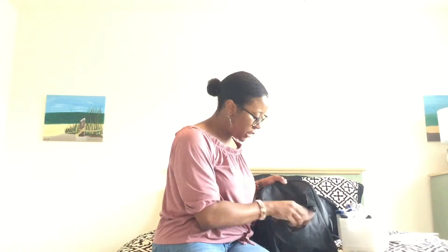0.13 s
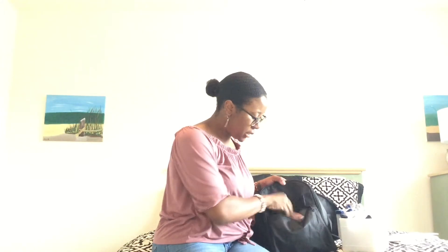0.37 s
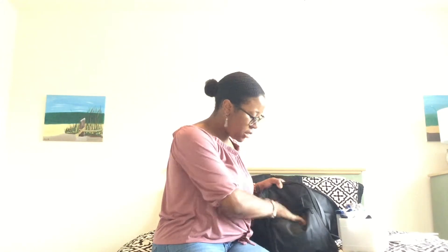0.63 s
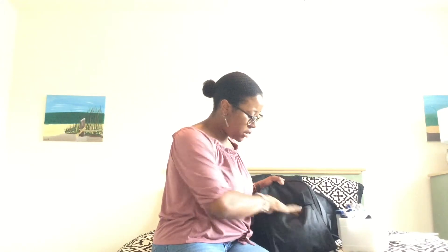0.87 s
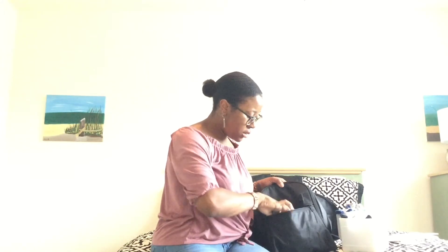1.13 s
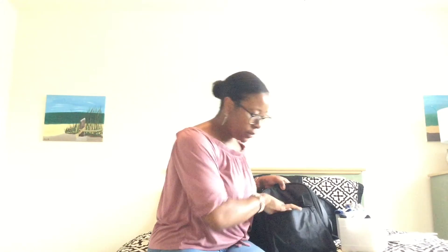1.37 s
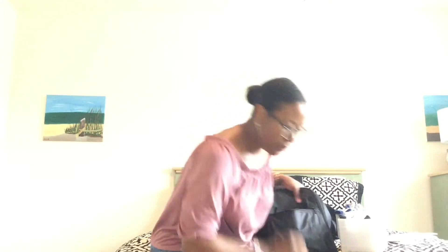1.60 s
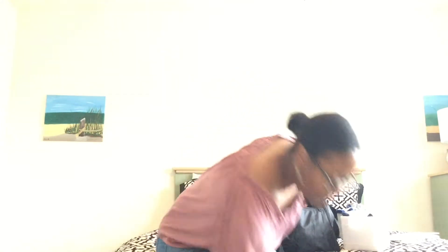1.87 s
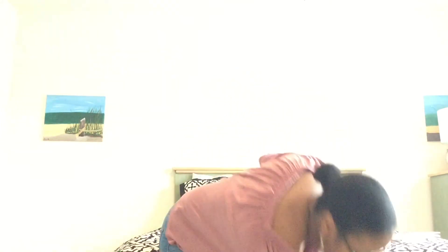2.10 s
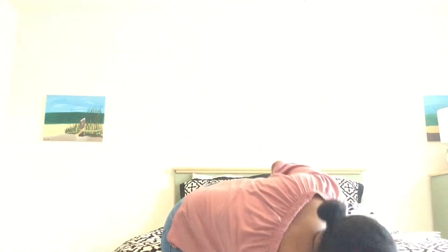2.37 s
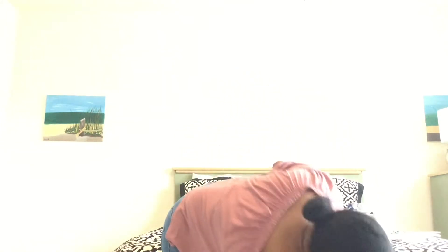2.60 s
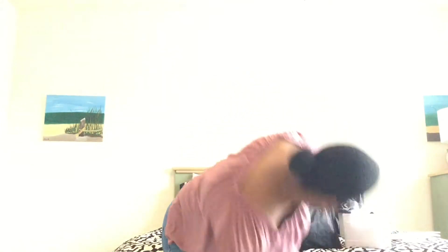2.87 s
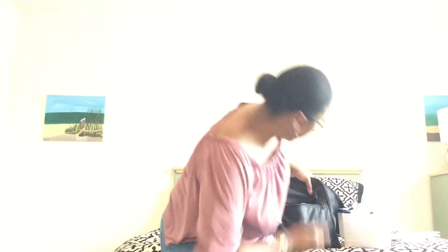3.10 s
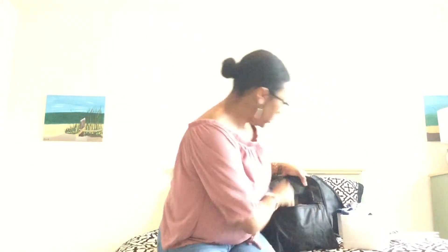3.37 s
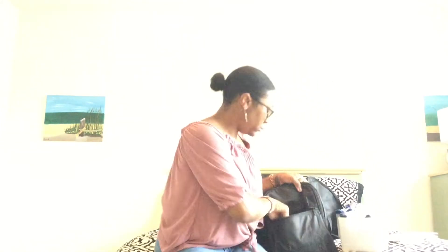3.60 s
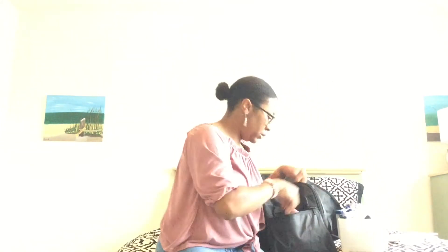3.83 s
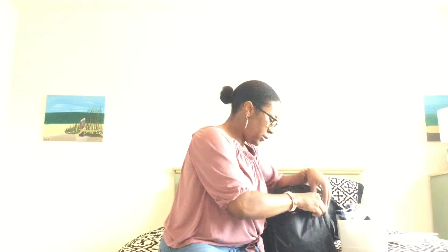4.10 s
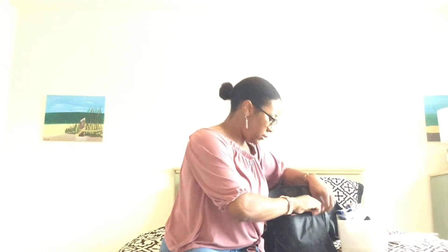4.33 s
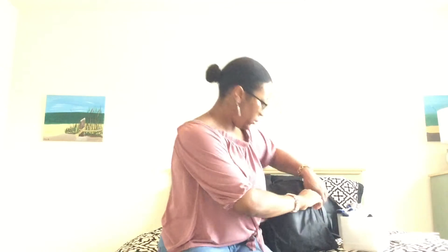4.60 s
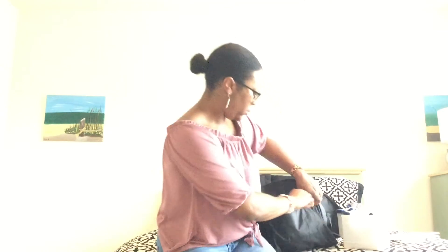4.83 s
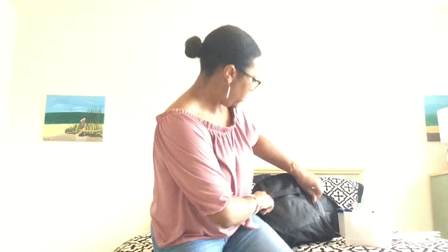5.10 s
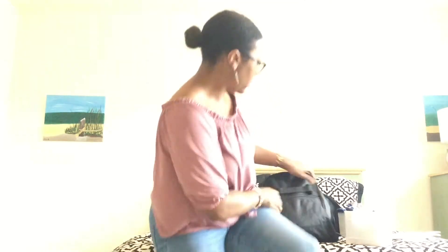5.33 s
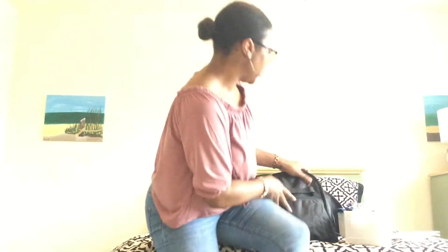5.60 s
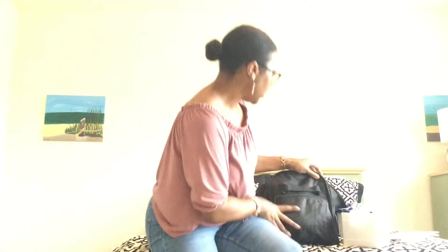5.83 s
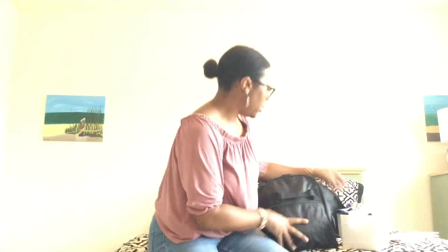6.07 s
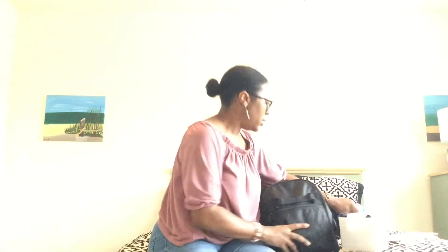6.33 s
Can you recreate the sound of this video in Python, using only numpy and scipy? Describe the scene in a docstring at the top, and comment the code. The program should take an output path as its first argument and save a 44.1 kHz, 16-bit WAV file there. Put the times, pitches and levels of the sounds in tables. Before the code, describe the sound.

In a small quiet room, a hand slides brightly over a bag's woven fabric, with soft knocks and muffled low bumps. After another rustling grip the handling nearly stops, leaving faint shuffles. Rustles and fine metal pull ticks return, building to a loud crumple and drumming thumps near five seconds, a brief rasp, lighter rubs, then a strong knock. Close small microphone, faint wavering hum.

```python
"""A fabric duffel bag is handled on a bed in a small quiet room, over room noise and a wavering hum.
At first skin slides over the weave (patchy, gritty noise) while the first knocks fall (short rings, snaps).
Then the stuffed bag booms and its creases rustle (noise through resonances); a metal pull ticks (beating sines).
Near 5 s the pocket mouth rasps shut (two rough gliding partials); ticks and a last strong knock follow."""
import sys
import numpy as np
from scipy import signal
from scipy.fft import rfft, irfft, next_fast_len
from scipy.io import wavfile
from scipy.ndimage import uniform_filter1d, map_coordinates

SR = 44100
rng = np.random.default_rng(int(sys.argv[2]) if len(sys.argv) > 2 else 0)


def how_loud(loudness_db):
    """Turn decibels into a plain amplitude multiplier (0 dB gives 1, 20 dB gives 10)."""
    steps = np.asarray(loudness_db, float) / 20
    return 10 ** steps


def file_out(sig):
    """Save sig as 16-bit WAV at sys.argv[1]."""
    # one column per channel
    cols = np.atleast_2d(sig).T
    # limit, then scale
    lim = np.clip(cols, -1, 1)
    pcm = np.round(lim * 32767).astype(np.int16)
    wavfile.write(sys.argv[1], SR, pcm)


N = 284577
T = np.arange(N) / SR


def unit(x):
    """Scale to rms 1."""
    return x / np.sqrt(np.mean(x ** 2) + 1e-20)


def along(points, hz):
    """Interpolate (Hz, value) points on a log frequency axis."""
    f, v = np.transpose(points)
    return np.interp(np.log(hz + 1), np.log(f + 1), v)


def curves(rows):
    """One value per sample for each column after the time."""
    s, *cols = np.transpose(rows)
    return [np.interp(T, s, c) for c in cols]


def wobble(rate_hz):
    """A smooth random curve, rate_hz knots a second."""
    return map_coordinates(rng.standard_normal(int(N * rate_hz / SR) + 4), [T * rate_hz])


def narrow(width_hz):
    """Complex noise of rms 1 that makes a tone rough over this width."""
    return (unit(wobble(width_hz)) + 1j * unit(wobble(width_hz))) / np.sqrt(2)


def filtered(x, response):
    """x times a complex response of frequency."""
    m = next_fast_len(N + SR // 2)
    return irfft(rfft(x, m) * response(np.fft.rfftfreq(m, 1 / SR)), m)[..., :N]


def cut_above(f, hz, power):
    """Gain that falls above hz."""
    return 1 / (1 + (f / hz) ** power)


def cut_below(f, hz, power):
    """Gain that falls below hz."""
    return 1 / (1 + (hz / (f + 1)) ** power)


def modes(table):
    """Causal response of (center_hz, width_hz, level_db) resonances, signs alternating."""
    def response(f):
        total = 0
        for k, (hz, width_hz, db) in enumerate(table):
            bell = 1j * f * width_hz / (hz * hz - f * f + 1j * f * width_hz)
            total = total + (-1) ** k * how_loud(db) * bell
        return total
    return response


def friction(slips_hz, spread_db, share, patchy_db):
    """Noise in narrow random patches plus a share of small slips of uneven size."""
    z = signal.stft(rng.standard_normal(N), nperseg=1024)[2]
    field = uniform_filter1d(rng.standard_normal(z.shape), size=3, axis=0)
    field = uniform_filter1d(field, size=5, axis=1)
    bed = signal.istft(z * how_loud(patchy_db * unit(field)), nperseg=1024)[1][:N]
    sizes = how_loud(spread_db * np.tanh(rng.standard_normal(N)))
    grit = (rng.random(N) < slips_hz / SR) * rng.choice([-1, 1], N) * sizes
    return unit(bed) + share * unit(grit)


def gestures(rows, rise_s, rest_db):
    """Level in dB of gestures that rise, hold and fade (seconds per 20 dB), power-summed with a rest level."""
    t = T[::64]
    start_s, hold_s, fade_s, db = (c[:, None] for c in rows)
    rise = np.maximum(start_s - t, 0) / rise_s
    fade = np.maximum(t - start_s - hold_s, 0) / np.maximum(fade_s, .01)
    power = np.interp(T, t, np.sum(how_loud(2 * (db - 20 * (rise + fade))), axis=0))
    return 10 * np.log10(power + how_loud(2 * rest_db))


# stuffed bag: center_hz, width_hz, level_db
BAG_MODES = [(158, 44, -9.5), (191.3, 21.4, 1.5), (232.6, 59, -11.5)]


def boom():
    """Sparse slips excite the low modes of the stuffed bag."""
    noise = friction(60, 8.0, share=0.51, patchy_db=1)
    return unit(filtered(noise, lambda f: modes(BAG_MODES)(f) * cut_above(f, 300, 4)))


# side walls of the bag: center_hz, width_hz, level_db
SIDE_MODES = [(246.8, 35.6, 0), (303.4, 26.6, -2), (328.4, 23.6, -0.5), (404, 114, -13)]


def flex():
    """Slips excite the side walls as they flex."""
    noise = friction(90, 6.0, share=0.7, patchy_db=1.0)
    return unit(filtered(noise, lambda f: modes(SIDE_MODES)(f) * cut_above(f, 520, 4) * cut_below(f, 200, 4)))


# stiff panels: center_hz, width_hz, level_db
CREASE_MODES = [(522, 72, 1), (626.4, 32, 3.5), (683, 71, -0.5), (990, 162, -1), (1180, 155, 0.5),
                (1515, 295, -5), (2080, 470, -5.5), (2890, 1800, -18)]


def rustle():
    """Creases excite the stiff panels with slips and patchy noise."""
    noise = friction(300, 3.7, share=0.52, patchy_db=3.0)
    return unit(filtered(noise, lambda f: modes(CREASE_MODES)(f) * cut_below(f, 420, 4)))


# rub spectrum: frequency_hz, density_db_per_hz
RUB_SPECTRUM = [(2200, -4), (3200, 1), (4300, -1), (5500, -3), (7000, -8.5), (9000, -12.5)]


def rub():
    """Dense slips of the rubbed cloth, shaped by a smooth treble spectrum."""
    noise = friction(650, 3.4, share=0.4, patchy_db=3.5)
    return unit(filtered(noise, lambda f: how_loud(along(RUB_SPECTRUM, f))))


# ribs of the weave: center_hz, width_hz, level_db
WEAVE_MODES = [(5330, 530, -12), (7240, 1000, -10.5), (8110, 126, 1.5), (9700, 990, -3), (10960, 226, 4),
               (11900, 630, 0.5), (13400, 510, -5), (14000, 1900, -7)]


def slide():
    """Skin on the weave: dense slips, resonant across the ribs, a plain hiss elsewhere."""
    hiss = friction(830, 6.2, share=0.32, patchy_db=4.5)
    flat = unit(filtered(hiss, lambda f: (1 + .5 * np.exp(-((f - 9200) / 1500) ** 2)) * cut_below(f, 6200, 8)))
    ribbed = unit(filtered(hiss, lambda f: modes(WEAVE_MODES)(f) * cut_below(f, 5000, 8)))
    return np.where(T < .52, ribbed, flat)  # the first long slide crosses the ribs


# restless hands between gestures: time_s, rustle_db
REST = [(0, -93), (.3, -78), (.6, -69), (.79, -77), (1.1, -77), (1.38, -81), (1.81, -73), (2.08, -77),
        (2.3, -77.5), (2.84, -85), (3.43, -78), (3.7, -73), (4.0, -83.5), (4.5, -74), (4.8, -73),
        (5.3, -71.5), (5.93, -74.5), (6.45, -68)]
# pushes on the bag: start_s, hold_s, fade_s_per_20db, boom_db, flex_over_boom_db
PUSHES = [(0.223, 0.004, 0.1, -52.5, -3.5), (0.346, 0.17, -0.2, -54, -7), (0.429, 0.0061, 0, -43, -2.5),
          (0.533, 0.026, -0.12, -46, -3.5), (0.646, 0.014, 0.14, -54.5, 0), (0.75, 0.025, 0.4, -57.5, -4),
          (0.917, 0.14, 0.08, -51.5, -11.5), (1.205, 0.035, 0.9, -63, -6), (1.484, 0.037, 0.14, -48.5, -8),
          (1.567, 0.049, 0.01, -44.5, 1), (1.715, 0.0081, 0.2, -52.5, -8.5),
          (2.148, 0.038, 0.01, -57.5, 1.5), (2.287, 0.015, 0, -58, -7.5), (2.6, 0.048, 0.3, -65, -17),
          (2.933, 0.042, .2, -63.5, 1), (3.11, 0.016, 1.3, -63, -11.5), (3.473, 0.059, -0.06, -49.5, -11.5),
          (3.55, 0.26, 0.4, -58.5, -4.5), (4.017, 0.074, -0.9, -58, -8), (4.143, 0.023, 1.1, -57, -10),
          (4.316, 0.049, 0.35, -50, -9), (4.603, 0.019, 1.1, -54, -3), (4.688, .05, 0.24, -45, -16),
          (4.866, 0.12, 0.12, -47, 1.5), (5.037, 0.052, 0.16, -44.5, -3.5), (5.152, 0.014, 0.1, -46, 6),
          (5.26, 0.04, 0.05, -56, -27), (5.395, 0.016, 0, -61, -2), (5.548, 0.0035, 0.16, -49.5, -14),
          (5.732, 0.048, 0.17, -54, -6.5), (5.917, 0.018, 1, -60, -7), (6.023, 0.004, -0.14, -51.5, -8.5),
          (6.144, 0.0055, 0.13, -48, -13.5), (6.312, 0.052, -0.05, -44, -3.5), (6.445, .01, 3, -35, -8.5)]
# grips that crumple the cloth: start_s, hold_s, fade_s_per_20db, rustle_db, rub_over_rustle_db
CRUMPLES = [(0, .005, 0.12, -60, 0.5), (0.19, 0.0028, 0.3, -67, 2.5), (0.386, 0.036, 0.05, -66.5, -12),
            (0.444, 0.03, 0.24, -61, -4), (0.646, 0.051, 0.05, -59, -8), (0.841, 0.19, 0.2, -67.5, -3.5),
            (1.219, 0.02, 0.26, -71.5, 2), (1.452, .04, 0.21, -59.5, -7.5), (1.547, 0.083, 0.05, -59, -0.5),
            (1.68, 0.021, 0.12, -67.5, 5.5), (2.138, 0.0092, 0.3, -66.5, -19), (2.942, .04, 0.35, -73, -16),
            (3.15, 0.11, 0, -76.5, -0.5), (3.477, 0.022, 0.15, -62, 0.2), (3.57, 0.049, 0.35, -67, -6),
            (3.707, .03, 0.32, -71, -1), (3.816, 0.041, 0.37, -68, -6.5), (4.067, .005, -0.02, -64.5, -7.5),
            (4.141, 0.056, 0.26, -67.5, -6), (4.326, .005, 0.38, -64, -3.5), (4.447, 0.2, 0.5, -69, -14),
            (4.691, 0.0083, -0.02, -54.5, -4.5), (4.742, .005, -0.05, -55.5, -15),
            (4.865, 0.049, 0.16, -53.5, -22), (4.947, 0.063, 0.16, -50.5, -14),
            (5.049, 0.098, 0.13, -49.5, -14.5), (5.379, 0.068, -0.16, -63.5, -7),
            (5.556, .005, -0.26, -66, -23.5), (5.663, 0.054, 2, -72, 1), (5.753, 0.022, 0.3, -66, -12),
            (6.023, 0.039, 0.05, -66.5, 4.5), (6.222, 0.038, 0.2, -69, 1), (6.318, 0.066, 0, -57, -9),
            (6.429, .03, 0.5, -58, -2.5)]
# skin over the weave: start_s, hold_s, fade_s_per_20db, level_db
SKIN_SLIDES = [(0, 0.016, 0.26, -51.5), (0.02, 0.44, 0.07, -53.5), (.5, 0.033, 0.4, -68.5),
               (0.627, 0.094, -0.2, -65), (0.855, 0.03, 0.46, -65), (1.23, 0.021, 0.3, -71),
               (1.538, 0.027, 0.23, -61), (1.58, 0.038, 0.21, -59), (3.146, 0.11, 0.3, -72.5),
               (3.47, 0.024, 0.4, -65.5), (3.791, 0.056, 0.15, -71), (4.164, .01, 0.25, -68),
               (4.338, 0.07, 0, -65.5), (4.65, 0.028, -0.04, -67), (4.99, .01, 0.2, -64.5),
               (5.06, 0.078, 0.2, -70.5), (5.27, 0.13, 0.1, -74.5), (5.655, 0.33, .1, -67.5),
               (6.023, 0.066, .07, -61), (6.206, 0.12, 0.5, -71), (6.33, 0.1, .01, -64.5)]


def hands():
    """Levels in dB of push, flex, rustle, rub and slide from the gestures."""
    push_rise_s, grip_rise_s, slide_rise_s = 0.04, 0.056, 0.051  # per 20 dB
    rest_db, = curves(REST)
    push, grip = np.transpose(PUSHES), np.transpose(CRUMPLES)
    return (gestures(push[:4], push_rise_s, rest_db + 9),
            gestures([*push[:3], push[3] + push[4]], push_rise_s, rest_db + 3),
            gestures(grip[:4], grip_rise_s, rest_db),
            gestures([*grip[:3], grip[3] + grip[4]], grip_rise_s, rest_db - 5.5),
            gestures(np.transpose(SKIN_SLIDES), slide_rise_s, rest_db - 8))


def cloth():
    """Each way of moving the bag excites its own resonances, at levels that waver."""
    push_db, flex_db, rustle_db, rub_db, slide_db = hands()
    catch = wobble(14)  # the cloth catches and lets go
    grain = wobble(55)  # single creases give way
    out = how_loud(push_db + 1.43 * wobble(18)) * boom()
    out += how_loud(flex_db + 1.9 * catch) * flex()
    out += how_loud(rustle_db + 1.35 * catch + 1.43 * grain) * rustle()
    out += how_loud(rub_db + 1.2 * catch + 0.34 * grain) * rub()
    return out + how_loud(slide_db + 0.27 * catch) * slide()


# tones and brushes of the bag: low drumming, squeaks, scrapes and one bright hiss of sliding skin
# start_s, length_s, center_hz, width_hz, relative_db
BAG_STROKES = [(0, 0.039, 1444, 77, -53), (0.18, 0.077, 1680, 260, -58), (0.183, 0.052, 2500, 260, -61.5),
               (0.186, 0.056, 866, 165, -61.5), (0.181, 0.04, 3400, 350, -66.5),
               (.19, 0.036, 211, 41, -41.5), (0.399, 0.056, 1251, 460, -52.5),
               (0.439, 0.029, 200.5, 27, -34), (1.433, 0.086, 2230, 580, -61.5),
               (1.53, 0.24, 4600, 1650, -58.5), (1.532, 0.26, 2450, 400, -67), (1.538, 0.1, 1102, 380, -59),
               (2.918, 0.14, 997, 900, -67.5), (3.839, 0.029, 5100, 620, -72),
               (3.815, 0.064, 1510, 250, -72), (3.903, 0.046, 2090, 130, -72.5),
               (4.446, 0.029, 2376, 360, -61.5), (4.7, 0.11, 184.6, 17, -37.5),
               (4.85, 0.042, 184, 18.6, -30.5), (4.872, 0.027, 226, 28, -23), (4.9, 0.018, 250, 25, -33),
               (4.916, 0.015, 237, 25, -38), (4.928, 0.018, 260, 30, -33), (4.95, 0.02, 317, 45, -33),
               (4.968, 0.047, 199, 22, -29), (5.014, 0.039, 180, 23.4, -31), (5.011, 0.05, 90.5, 11, -37),
               (6.1, 0.055, 1470, 130, -64), (6.01, 0.074, 4010, 2200, -57), (5.65, .14, 12500, 5000, -65)]


def strokes():
    """Each stroke is a rough tone, or a band of noise if wide, that swells and fades."""
    out = np.zeros(N + SR)
    for start_s, length_s, center_hz, width_hz, db in BAG_STROKES:
        t = T[:round(length_s * SR)]
        skew, evenness = (1, .8) if center_hz < 400 else (.6, .15)  # low ones drum evenly, others flutter
        shape = np.sin(np.pi * (t / length_s) ** skew)
        rough = narrow(width_hz)[:len(t)]
        rough = rough / np.abs(rough) ** evenness
        band = np.real(rough * np.exp(2j * np.pi * center_hz * t))
        out[round(start_s * SR):][:len(t)] += how_loud(db + 0.5) * shape * band
    return out[:N]


# knocks and snaps of the cloth: start_s, relative_db, pitch_hz, relative_boom_db, relative_treble_db
CLOTH_KNOCKS = [(0.184, -49.5, 1600, 10, -13.5), (0.406, -50, 1250, 5, 3), (0.431, -42, 730, -7, -22),
                (1.215, -51.5, 720, -5, -19), (1.443, -55, 2020, -8, -23), (1.682, -44.5, 1130, 5, -29.5),
                (2.137, -45, 574, -4, -35.5), (2.65, -68.5, 1570, 8.5, 2), (3.467, -54, 1100, 3, -16),
                (3.475, -50, 4000, -6, -10), (4.052, -49.5, 515, -2, -28), (4.14, -57, 3430, -7, 2),
                (4.153, -52, 1280, 4, -10), (4.3098, -47.5, 1180, 7, 3), (4.443, -57, 2370, -6, -8),
                (4.683, -46.5, 596, 6, -26), (4.732, -44, 662, -1, -37), (4.948, -39, 1080, -2, -24),
                (4.954, -35, 750, 4, -22), (4.975, -31.5, 740, -8, -14.5), (5.072, -40, 680, 1, -14),
                (5.39, -48.5, 522, -17, 2), (5.639, -56.5, 4400, -13, -12), (6.001, -50.5, 1290, -4, -17),
                (6.303, -44.5, 1100, 6, -15), (6.433, -31.5, 1180, -8, -22)]


def knocks():
    """A short ring of the struck panel, a dull snap, a crack with a dying hiss, and a push into the bag."""
    out, blows, t = np.zeros(N + SR), np.zeros(N), T[:SR // 8]
    onset = 1 - np.exp(-t / 0.00023)
    for start_s, db, pitch_hz, boom_db, treble_db in CLOTH_KNOCKS:
        ring = how_loud(-60 * t / 0.0092) * np.sin(2 * np.pi * pitch_hz * t)
        noise = rng.standard_normal((2, len(t)))
        snap = 0.33 * uniform_filter1d(noise[0], size=7) * how_loud(-60 * t / 0.0075)
        crack = noise[1] * (how_loud(-60 * t / 0.0089) + 0.079 * how_loud(-60 * t / 0.086))
        hit = (ring + snap) * onset + how_loud(treble_db - 7.0) * crack
        out[round(start_s * SR):][:len(t)] += how_loud(db + 4) * hit
        blows[round(start_s * SR)] = how_loud(db + boom_db + 39.5)
    bag = modes(BAG_MODES + SIDE_MODES)
    return out[:N] + filtered(blows, lambda f: bag(f) / (1 + 1j * f / 500) / (1 - 1j * 110 / (f + 1)))


# closing pocket mouth: time_s, slip_rate_hz, first_partial_db, second_partial_db
POCKET_SLIPS = [(5.035, 459.4, -62, -52), (5.062, 500, -58, -47), (5.078, 631, -51, -43),
                (5.088, 741, -42.5, -49), (5.112, 597, -49.5, -54), (5.14, 366, -37, -46.5),
                (5.16, 241.4, -42, -52), (5.19, 423, -46.5, -58)]


def pocket():
    """The edges slip past each other at a gliding, shaky rate; two partials, each rough in its own way."""
    slip_hz, first_db, second_db = curves(POCKET_SLIPS)
    turns = np.cumsum(slip_hz * (1 + .04 * wobble(90))) / SR
    first = how_loud(first_db) * narrow(150) * np.exp(2j * np.pi * turns)
    second = how_loud(second_db) * narrow(210) * np.exp(2j * np.pi * 2 * turns)
    closing = (T > POCKET_SLIPS[0][0]) * (T < POCKET_SLIPS[-1][0])
    return closing * np.real(first + second)


# metal pull contacts: start_s, relative_db, pitch_hz, t60_s, relative_hardness_db
PULL_TICKS = [(1.0444, -65, 9200, 0.035, -9), (1.851, -64, 8210, 0.03, -14),
              (2.1011, -66.5, 8300, 0.027, -12), (2.1535, -62.5, 9300, 0.024, -11),
              (2.268, -67.5, 9100, 0.024, -6), (3.5048, -54, 9130, 0.073, -4),
              (3.525, -55, 9140, 0.058, -12), (3.539, -58, 9150, 0.047, -18),
              (3.5544, -61.5, 9400, 0.057, -15.5), (4.0128, -55.5, 9200, 0.021, -17),
              (4.1397, -43, 9000, 0.013, -16), (4.153, -55, 9800, 0.032, -13),
              (4.3093, -48.5, 9160, 0.028, 2.5), (5.383, -58, 9400, 0.023, -1),
              (6.012, -54, 8900, 0.051, -16)]
# short-lived other modes of the pull: mode_hz, level_db
PULL_MODES = [(2450, 5), (6650, -4), (11200, -3), (12300, -3), (15000, -1)]


def ticks():
    """Each tick of the metal pull rings as two close, beating high sines at its own pitch, plus other modes."""
    out, t = np.zeros(N + SR), T[:SR // 5]
    onset = 1 - np.exp(-t / 0.00029)
    for start_s, db, pitch_hz, t60_s, hard_db in PULL_TICKS:
        phase = rng.uniform(0, 2 * np.pi)
        pair = np.sin(2 * np.pi * pitch_hz * t) + 0.92 * np.sin(2 * np.pi * 1.02 * pitch_hz * t + phase)
        rest = sum(how_loud(level_db + 2 * rng.standard_normal()) * np.sin(2 * np.pi * mode_hz * t)
                   for mode_hz, level_db in PULL_MODES)
        ring = how_loud(-60 * t / max(t60_s, .005)) * onset * pair
        # a hard contact wakes the other modes
        out[round(start_s * SR):][:len(t)] += how_loud(db - 2.5) * (ring + how_loud(hard_db - 1.0 - 60 * t / 0.014) * rest)
    return out[:N]


# mattress: center_hz, width_hz, level_db
MATTRESS_MODES = [(55.7, 89, -6), (96, 19, 3)]


def mattress(swell_db):
    """Noise through the mattress modes rumbles under shifting weight, following the pushes and the low swell."""
    over_push_db = -16
    rest_db = -64.5 + 0.69 * (swell_db - swell_db.mean())
    level_db = gestures(np.transpose(PUSHES)[:4], 0.12, rest_db - over_push_db) + over_push_db
    noise = rng.standard_normal(N)
    rumble = unit(filtered(noise, lambda f: modes(MATTRESS_MODES)(f) * cut_above(f, 120, 4)))
    return how_loud(level_db + 1.1 * wobble(6.2)) * rumble


# low swell, shared by hum and mattress: time_s, relative_db
LOW_SWELL = [(0.0, -92), (0.14, -71.5), (0.47, -53.5), (0.55, -71.5), (1.4, -79.5), (1.67, -58.5),
             (1.98, -66.5), (2.3, -57), (2.44, -81), (2.6, -60.5), (2.77, -67.5), (3.54, -54),
             (3.72, -59.5), (4.69, -53), (4.83, -71), (5.05, -51.5), (5.19, -61.5), (5.5, -59), (5.84, -59),
             (6.45, -55)]


def hum(swell_db):
    """A low sine that wavers in level and phase."""
    level = np.sqrt(2) * how_loud(swell_db - 1.5 + 1.93 * wobble(8))
    return level * np.sin(2 * np.pi * 124.5 * T + 1.6 * wobble(5))


# room noise: frequency_hz, density_db_per_hz
AIR_SPECTRUM = [(15, -40), (25, -15), (141, 3), (211, -13), (352, -15.5), (414, -18), (587, -35.5),
                (1060, -61.5), (1150, -41), (3880, -42), (12100, -41.5), (14600, -45), (15800, -65)]


def air():
    """Room noise: faintly patchy noise through a fixed spectrum, its level wavering."""
    noise = friction(33, 1.2, share=0.3, patchy_db=1.5)
    return how_loud(-62.5 + 2.3 * wobble(4.86)) * unit(filtered(noise, lambda f: how_loud(along(AIR_SPECTRUM, f))))


# walls: frequency_hz, t60_s
WALL_DECAY = [(150, 0.47), (1500, 0.26), (10000, 0.15)]


def room(x):
    """Each frequency of the walls' answer, a noise tail, dies at its own speed."""
    hz, t, z = signal.stft(rng.standard_normal(SR // 2), SR, nperseg=256)
    decay = how_loud(-60 * t / along(WALL_DECAY, hz)[:, None])
    tail = signal.istft(z * decay, SR, nperseg=256)[1]
    return signal.fftconvolve(np.pad(x, (200, 0)), tail / np.linalg.norm(tail))[:N]  # 200 samples late


def scene():
    """The bag close by, in the room; its boom reaches the microphone mostly direct."""
    hits, metal, rubbing = knocks(), ticks(), cloth() + strokes() + pocket()
    bright = filtered(rubbing, lambda f: cut_below(f, 450, 4))
    walls = room(how_loud(-3.0) * hits + how_loud(-10) * metal + how_loud(-12.5) * bright)
    swell_db, = curves(LOW_SWELL)
    return (hits + metal + rubbing + walls + mattress(swell_db) + hum(swell_db) + air())[None]


def top_cut(x):
    """Nothing passes above the cut-off."""
    return signal.sosfilt(signal.butter(12, 16240, fs=SR, output="sos"), x)


def record(dry):
    """A small microphone with weak deep bass and a band limit at 15.8 kHz."""
    mix = filtered(dry, lambda f: (f < 15800) * cut_below(f, 42, 6))
    return top_cut(mix)


dry = scene()
out = record(dry)
file_out(out)
```